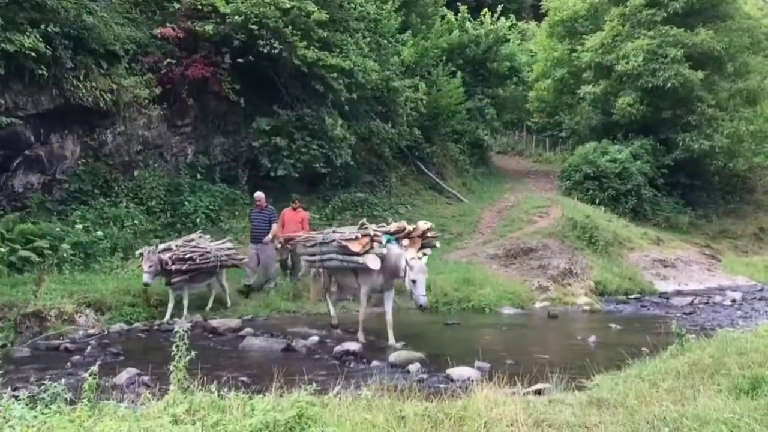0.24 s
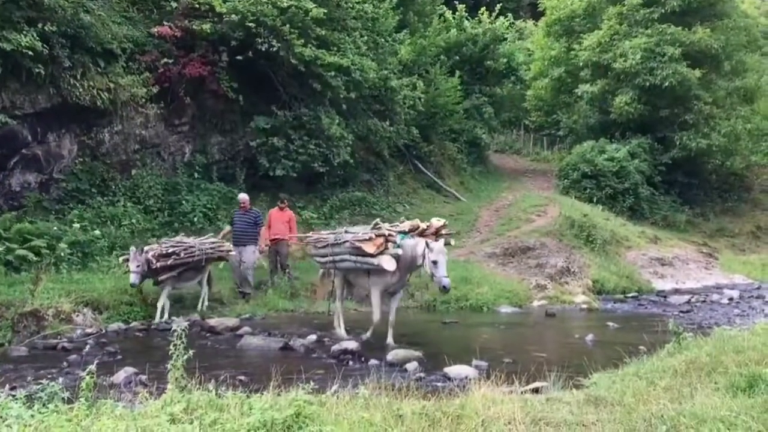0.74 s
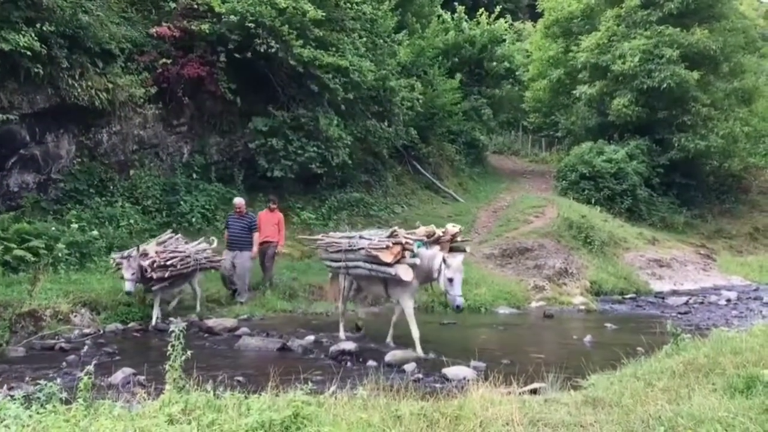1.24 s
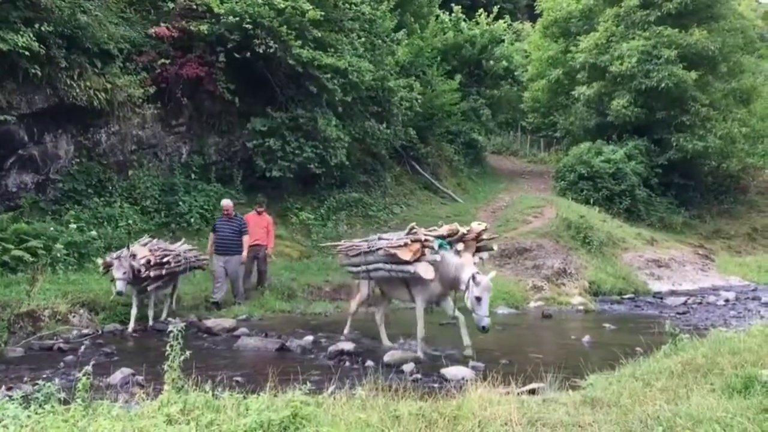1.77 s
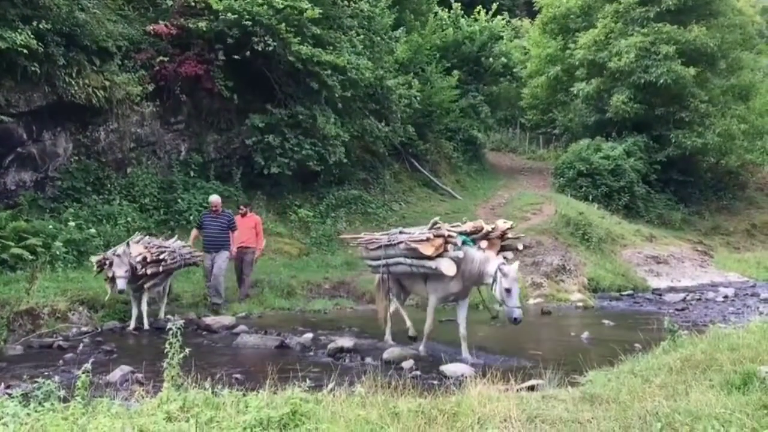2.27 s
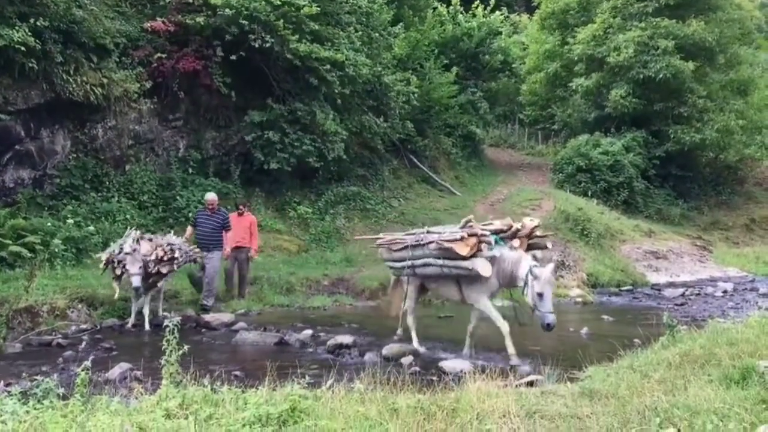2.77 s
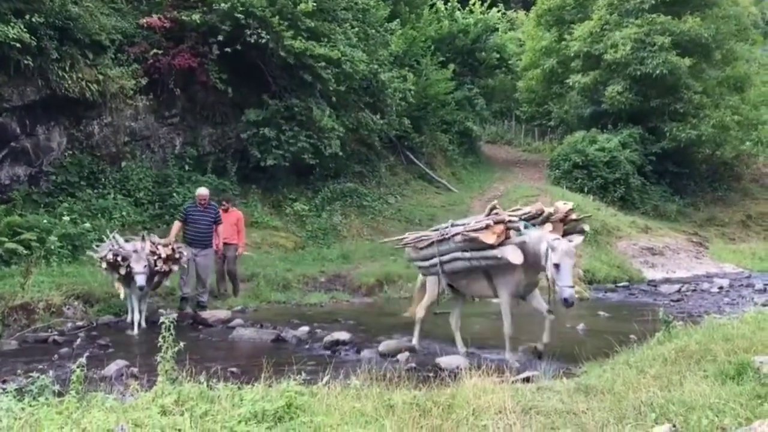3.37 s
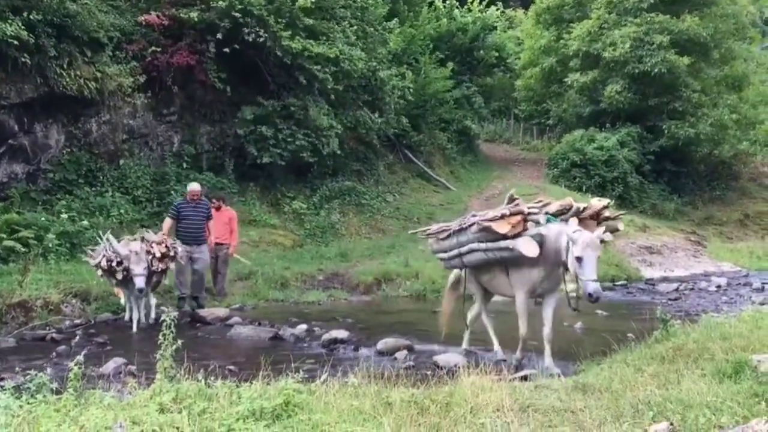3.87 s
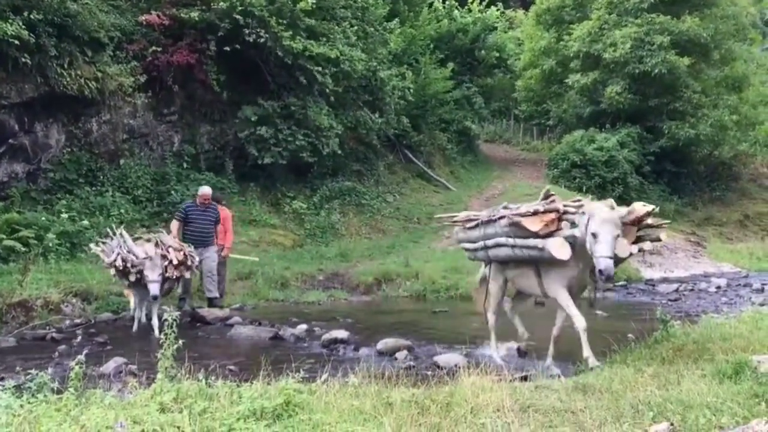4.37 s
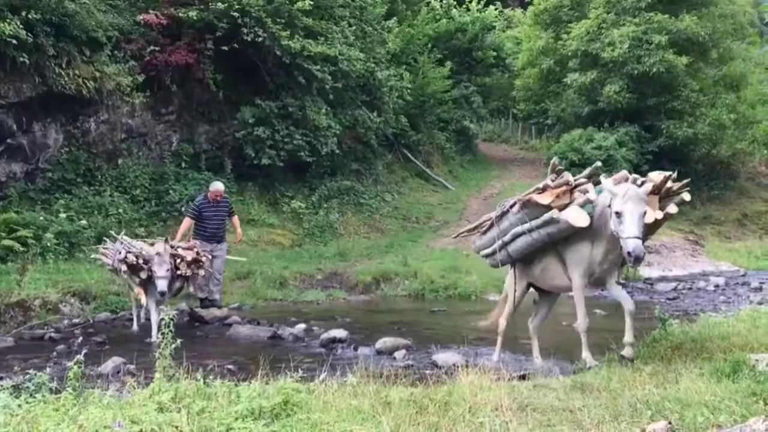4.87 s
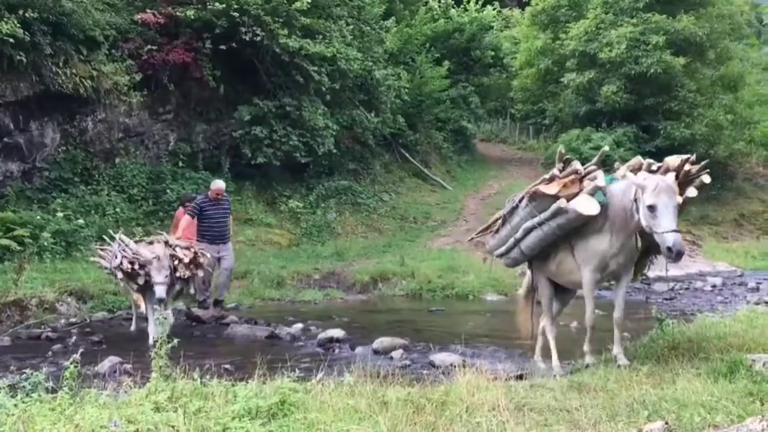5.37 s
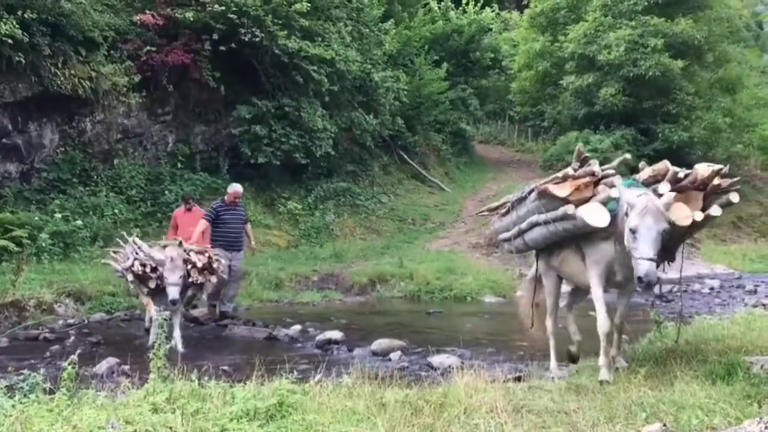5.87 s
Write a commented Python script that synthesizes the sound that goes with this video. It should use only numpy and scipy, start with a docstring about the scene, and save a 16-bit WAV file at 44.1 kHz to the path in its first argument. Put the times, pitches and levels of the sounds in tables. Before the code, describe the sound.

Outdoors by a shallow stream, water runs steadily and light wind bumps the microphone. Hooves knock on stones and faintly splash. Then a donkey brays four times: each hee is a shrill, breathy indrawn whistle, each haw a lower, rough, rattling open-throated cry. The first and third haws sink into a low groan. Small splashes continue, with a weak echo from the wooded bank.

```python
"""Out in the shallows of a stream under a wooded bank, water runs and light wind bumps the microphone.
First a pack donkey's hooves knock on stones and splash as it wades: short dying bursts of noise.
From 1.4 s it brays four times. Each hee is a whistle in a rush of indrawn air, shrill when blown hard;
each haw is a rough, rattling voice through an open throat, and the first and third end in a low groan.
Splashes go on among the brays; the bank returns a weak echo and scatter, and a fast limiter holds the peaks."""
import sys
import numpy as np
from scipy import signal
from scipy.fft import rfft, irfft, next_fast_len
from scipy.io import wavfile
from scipy.ndimage import uniform_filter1d, minimum_filter1d

SR = 44100
rng = np.random.default_rng(int(sys.argv[2]) if len(sys.argv) > 2 else 0)


def log_audio(samples):
    """Write samples as a 16-bit WAV file to the path given in sys.argv[1]."""
    # one column per channel
    frames = np.atleast_2d(samples).T
    # limit to full scale, then quantise
    limited = np.clip(frames, -1, 1)
    pcm = np.round(limited * 32767).astype(np.int16)
    wavfile.write(sys.argv[1], SR, pcm)


N = 269892
TIME = np.arange(N) / SR

# Levels in the tables of single sounds are nominal: the functions add trims and envelopes.
# the hees: (start t/s, length t/s, weak lead-in t/s, air's tail t/s, whistle level/dB, opening squeak level/dB,
#   whistle growth level/dB, rushing air level/dB, air growth level/dB, air arch level/dB, bright hiss level/dB)
HEES = [(1.378, 0.2884, 0.0097, .05, -22, -61, 3.5, -38, 12.5, 14.5, -50.5),
        (2.568, 0.21, 0.026, 0.082, -20.5, -57, 0.5, -33, -6.5, 4, -40.5),
        (3.507, 0.469, 0.00082, 0.085, -22.5, -34, 3, -32.5, 0.5, 6, -39.5),
        (5.017, 0.39, 0.01, 0.2, -20.5, -44, -1, -36, 6, -0.5, -44)]
# pitch of the whistle, one curve a hee: (t/s, f/Hz)
WHISTLE_PITCHES = [
    [(1.35, 2438), (1.542, 2357), (1.55, 2190), (1.554, 2360), (1.594, 2266), (1.66, 2308), (1.69, 2260)],
    [(2.53, 2395), (2.548, 2378), (2.552, 2415), (2.582, 2274), (2.732, 2309), (2.78, 2227), (2.8, 2330)],
    [(3.5, 2498), (3.508, 2560), (3.536, 2325), (3.656, 2316), (3.882, 2140), (3.92, 2116), (3.99, 2197)],
    [(5.0, 2530), (5.034, 2410), (5.04, 2390), (5.206, 2231), (5.278, 2358), (5.372, 2278), (5.42, 2343)],
]
# the whistle cracks, jumping up and thinning: t/s
CRACK_TIMES = [2.553, 2.625, 3.805, 5.029, 5.067, 5.139]
# the whistle slips and part of it turns to rushing air: (middle t/s, length t/s, loss level/dB)
SLIPS = [(1.515, .2, 12.5), (2.62, 0.098, 2.5), (3.555, 0.1, 9), (3.625, 0.12, 6), (3.94, .17, 9.5),
         (5.295, .09, -0.5)]
# overtones of the whistle: (multiple, rounded when used; level/dB)
OVERTONES = [(2, -18.5), (3, -12.5), (4, -31.5), (5, -11), (6, -35), (7, -21)]
# resonances of the indrawn air: (f/Hz, width f/Hz, level/dB)
INHALE_MODES = [(1264, 290, 1.5), (1732, 540, 7.5), (2240, 120, -1)]
# colour of the bright hiss around 3 kHz that goes with the hee: (f/Hz, level/dB per Hz)
BRIGHT_HISS_COLOUR = [(1500, -47), (2500, -9), (2900, 7), (3450, 8), (4200, -16.5), (7000, -14.5),
                      (15000, -44)]

# the haws: (start t/s, length t/s, effort level/dB, settled roughness 0-1, first, turning and last pitch f/Hz,
#   turn at share of length, first, turning and last throat f/Hz before narrowing and closing,
#   chest share level/dB, late chest gain level/dB, final closing of the mouth 0-1)
HAWS = [(1.74, 0.36, -22.5, .64, 413.4, 444.6, 428.6, 0.43, 1286, 1315, 1376, -12, 2.5, .01),
        (2.857, 0.5, -24, 0.67, 424, 441.5, 383.7, 0.66, 1314, 1276, 1326, -13, 7.5, 0.18),
        (4.028, 0.095, -23, 0.69, 440, 447.3, 409, 0.47, 1330, 1334, 1310, -12.5, -3, 0.08),
        (4.099, .7, -22, .68, 440, 418.9, 371.9, .42, 1273, 1275, 1410, -12, 12.5, 0.25),
        (5.524, 0.69, -22, .68, 354, 365.3, 322, .4, 1367, 1378, 1196, -17, 1, .02)]
# the mouth gapes and the throat weakens (negative: strengthens):
# (middle t/s, length t/s, ring gain level/dB, rasp gain level/dB, throat loss level/dB)
GAPES = [(1.83, 0.15, 6.5, 0, 0.5), (2.05, 0.15, 8, 4.5, -2), (3.15, 0.29, 9, 6, -1.5),
         (3.25, 0.14, 13.5, 7.5, -2), (4.47, 0.095, 13, 3.5, 2.5), (4.56, 0.18, 7.5, -0.5, -1.5),
         (5.69, 0.36, 4, 0.5, 2), (5.945, 0.1, 15.5, -1.5, 2), (6.07, 0.19, 13, -2, 0)]
# groans that end a haw: (start t/s, length t/s, effort level/dB, change at the end level/dB,
#   first roughness 0-1, first pitch f/Hz, first throat f/Hz, chest share level/dB, ring share level/dB)
GROANS = [(2.048, 0.22, -20.5, -21, 0.17, 308.6, 1507, -15, -15),
          (4.792, 0.209, -42.5, 3.5, 0.57, 295.5, 1300, -6.5, -5)]
# short catches of the throat: (t/s, level/dB, length t/s, resonance f/Hz, width f/Hz)
CATCHES = [(1.744, -34.5, 0.031, 850, 159), (2.403, -45, 0.067, 1980, 500), (2.847, -27, 0.012, 1170, 1050),
           (5.399, -32, 0.026, 1770, 391), (5.447, -29, 0.05, 1747, 150), (5.528, -29.5, 0.051, 1040, 220)]
# resonances of the chest: (f/Hz, width f/Hz, level/dB)
CHEST_MODES = [(386.3, 164, 10.5)]
# the pharynx at the start of a haw: (f/Hz, width f/Hz, level/dB)
PHARYNX_MODES = [(884, 430, 11.5)]
# resonances of the throat, shifted together by each haw: (f/Hz, width f/Hz, level/dB)
THROAT_MODES = [(1276, 210, 11.5), (1620, 264, 2.1)]
# upper resonance of the open mouth: (f/Hz, width f/Hz, level/dB)
MOUTH_MODES = [(2015, 900, 0)]
# colour of the rasp: (f/Hz, level/dB per Hz)
RASP_COLOUR = [(2000, -85), (2700, 4.5), (3200, 12.5), (4100, 1.5), (6000, 1), (7600, -15), (9000, -13),
               (11300, -7), (13000, -13), (15500, -17.5)]

# hooves on stones: (t/s, level/dB)
KNOCKS = [(0.15, -29), (0.181, -27.5), (0.25, -31), (0.626, -30), (0.645, -36), (1.209, -34.5)]
# splashes: (t/s, level/dB)
SPLASHES = [(0.1775, -67), (1.0999, -62), (3.3275, -60), (3.355, -54), (3.9805, -53.5), (4.5944, -50),
            (4.6274, -53.5), (5.2275, -51)]
# colour of a knock: (f/Hz, level/dB per Hz)
KNOCK_COLOUR = [(100, -46), (400, -11), (1100, 3.5), (1900, -1), (3500, -10), (9000, -51), (16000, -47)]
# colour of a splash: (f/Hz, level/dB per Hz)
SPLASH_COLOUR = [(1000, -17), (3000, 0), (5500, 1.5), (8200, 2), (9500, -7), (16000, -27)]
# the stream before rippling: (t/s, running water level/dB, wading slosh level/dB)
WATER_LEVELS = [(0, -49.5, -47.5), (.8, -49, -47), (.98, -47.5, -54.5), (2.35, -51, -44), (3.4, -46.5, -60),
                (6.12, -44.5, -54.5)]
# colour of running water: (f/Hz, level/dB per Hz)
WATER_COLOUR = [(40, 10), (100, -6), (170, -2.5), (300, 3.5), (700, 2), (1200, -1), (2000, -2.5),
                (3300, -7), (5000, -17.5), (9000, -24), (15500, -34)]
# the dull slosh of wading legs: (f/Hz, level/dB per Hz)
SLOSH_COLOUR = [(60, -19), (300, -3.5), (1200, -7.5), (3000, -17), (15000, -40.5)]
# dying away of the scatter from the wooded bank: (f/Hz, 60 dB decay t/s)
BANK_DECAY = [(200, 0.077), (1500, 0.17), (4000, 0.074), (12000, 0.027)]
# wind buffets, added to the calm level: (t/s, level/dB, length t/s)
GUSTS = [(0, -45.5, 0.059), (0.21, -51.5, 0.26), (0.633, -43.5, 0.099), (0.762, -45, 0.21),
         (2.41, -45.5, 0.086), (2.661, -40.5, 0.11), (3.047, -52, 0.051), (4.413, -48, 0.11),
         (4.93, -49, 0.09), (5.402, -48, 0.077), (5.73, -40, 0.15)]
# colour of wind at the microphone: (f/Hz, level/dB per Hz)
WIND_COLOUR = [(15, -24), (48, 0), (85, -2), (130, -13), (250, -25), (2000, -90)]

# hee: the air starts before the whistle, swells in after its start and outlasts it
AIR_LEAD_S, AIR_SWELL_S = .075, 0.022
AIR_LEAD_DB, AIR_ONSET_DB, AIR_TRAIL_DB = -20.5, -3, -20
HISS_LEAD_DB, HISS_SAG_DB = -13, -7
# the whistle starts weakly before it catches
WHISTLE_CATCH_S, WHISTLE_WEAK_DB = 0.014, -11
WHISTLE_RELEASE_S, WHISTLE_OFF_DB = 0.047, -36
SLIP_TO_AIR = 0.12  # dB of air gained per dB of whistle lost
# attack and release of haws and groans
ATTACK_S, RELEASE_S, SILENT_DB = 0.028, 0.033, -20.5
# a haw starts rougher and chestier with a narrower throat, and settles quickly
SETTLE_S, START_ROUGH, START_CHEST_DB, START_NARROW = 0.031, .3, 13.5, 0.02
LATE_EFFORT_DB, SURGE_DB = -5, 1.38  # the effort tires and surges
RING_DB, RASP_DB = -19, -21  # shares of mouth ring (before its trim) and rasp
BREATH_S = 0.51  # time in which the air runs out
CLOSING_S = 0.0674  # the mouth closes over the end of a haw
# groan: share of length held before it changes, then how it sags and dulls
GROAN_HOLD, GROAN_SAG_HZ_PER_S, GROAN_CLOSING = 0.41, 195, 0.22
GROAN_END_ROUGH, GROAN_RASP_DB, GROAN_DULLING_DB = 1, -17.5, -19
BAND_EDGE_HZ = 15650


def hee(row, pitch, squeak_s=0.012, jitter=0.0033, flutter=0.11, air_trim_db=2.5, knee_db=-22,
        hiss_trim_db=-2.5, gasp=0.4, air_grit=0.65, crack_s=0.00323, crack_db=-9, crack_leap=0.0636,
        breathy_db=-7):
    """Indrawn air whistles in the larynx; blown hard, the whistle turns shrill."""
    start, length, lead, tail, level_db, squeak_db, *breath = row
    t = np.arange(start - AIR_LEAD_S, start + length + tail, 1 / SR)
    tone_db, rush_db, bright_db = inhale(t, start, length, lead, tail, level_db, *breath)
    crack = sum(np.exp(-((t - s) / crack_s) ** 2) for s in CRACK_TIMES)
    hz = follow(pitch, t)[0] * (1 + crack_leap * crack)

    # the more air rushes past, the weaker and less steady the whistle
    breathy = np.minimum(amp(rush_db - tone_db), 1)
    unrest = 1 + 3 * breathy
    turns = np.cumsum(hz * (1 + jitter * unrest * wobble(len(t), hz=240))) / SR
    strength = amp(tone_db + crack_db * crack + breathy_db * breathy ** 2)
    fluttering = evened(np.exp(flutter * unrest * wobble(len(t), hz=44.6)))
    whistle = strength * np.exp(2j * np.pi * turns) * fluttering

    gusty = rng.standard_normal(len(t)) * np.exp(gasp * wobble(len(t), hz=79))
    rush = amp(rush_db + air_trim_db) * steadied(tract(gusty, INHALE_MODES), seconds=0.72)

    # above a knee the wave steepens and grows mostly odd overtones
    wave = whistle + air_grit * rush
    shrill = abs(wave) / (1 + (amp(knee_db) / (abs(wave) + 1e-9)) ** 2.1)
    overtones = shrill * sum(amp(db) * np.cos(round(k) * np.angle(wave)) for k, db in OVERTONES)
    # the whistle catches with a brief squeak an octave up
    squeak = amp(squeak_db) * np.exp(-(2 * (t - start) / squeak_s - 1) ** 2)
    overtones += squeak * np.cos(2 * np.angle(whistle))

    hiss = amp(bright_db + hiss_trim_db) * coloured(gusty, BRIGHT_HISS_COLOUR)
    sound = np.sqrt(2) * ((whistle + rush).real + overtones) + hiss
    return t[0], sound * signal.windows.tukey(len(t), .03)


def inhale(t, start, length, lead, tail, tone_db, tone_growth_db, air_db, growth_db, arch_db, hiss_db):
    """Levels of whistle, air and bright hiss: the air grows and arches around the whistle."""
    end = start + length
    u = np.clip((t - start) / length, 0, 1)
    slip_db, = bumps(SLIPS, t)
    catches = start - WHISTLE_CATCH_S
    begins = catches - max(lead, 0)
    attack = np.interp(t, [begins - WHISTLE_CATCH_S, begins, catches, start],
                       [WHISTLE_OFF_DB, WHISTLE_WEAK_DB, WHISTLE_WEAK_DB, 0])
    release = WHISTLE_OFF_DB * np.maximum(t - end, 0) / WHISTLE_RELEASE_S
    tone = attack + tone_growth_db * (u - .5) + release
    swell = np.interp(t, [start - AIR_LEAD_S, start, start + AIR_SWELL_S], [AIR_LEAD_DB, AIR_ONSET_DB, 0])
    flow = SLIP_TO_AIR * slip_db + np.interp(t, [end, end + tail], [0, AIR_TRAIL_DB])
    air = swell + growth_db * (u - .5) - arch_db * (2 * u - 1) ** 2
    hiss = np.interp(t, [start - AIR_LEAD_S, start], [HISS_LEAD_DB, 0]) + HISS_SAG_DB * (u - .5)
    return tone_db + tone - slip_db, air_db + air + flow, hiss_db + hiss + flow


def haw(start, length, effort_db, rough, first_hz, turn_hz, last_hz, turn, first_throat_hz, turn_throat_hz,
        last_throat_hz, chest_db, late_db, closing):
    """One push of air: pitch and throat turn once, and the chest's share shifts as the effort tires."""
    age = np.arange(0, length, 1 / SR)
    t, u = start + age, age / length
    fresh = np.exp(-age / SETTLE_S)
    ring_db, rasp_db, loss_db = bumps(GAPES, t)
    surge_db = SURGE_DB * wobble(len(t), hz=6.6)
    level_db = effort_db + held(t) + LATE_EFFORT_DB * u ** 2 + surge_db - loss_db
    hz = np.interp(u, [0, turn, 1], [first_hz, turn_hz, last_hz])
    shut = np.clip(closing, 0, .5) * np.interp(age, [length - CLOSING_S, length], [0, 1])
    opening = 1 - START_NARROW * fresh - shut
    throat_hz = opening * np.interp(u, [0, turn, 1], [first_throat_hz, turn_throat_hz, last_throat_hz])
    # the chest is spared the throat's loss
    low_db = chest_db + START_CHEST_DB * fresh + late_db * u ** 2 + loss_db
    return voiced(t, age / BREATH_S, hz, rough + START_ROUGH * fresh, level_db, throat_hz, low_db,
                  RING_DB + ring_db, RASP_DB + rasp_db)


def groan(start, length, effort_db, fade_db, first_rough, pitch_hz, throat_hz, chest_db, ring_db, spent=0.85):
    """On the last of the air the folds drop to a low note, which sags, frays and dulls."""
    age = np.arange(0, length, 1 / SR)
    t, u = start + age, age / length
    late = np.interp(u, [GROAN_HOLD, 1], [0, 1])
    rough = first_rough + (GROAN_END_ROUGH - first_rough) * late ** 2
    hz = pitch_hz - GROAN_SAG_HZ_PER_S * age
    level_db = effort_db + held(t) + fade_db * late
    low_db = chest_db - fade_db * late  # the chest is spared the change of level
    dulling_db = GROAN_DULLING_DB * late
    return voiced(t, spent + age / BREATH_S, hz, rough, level_db, throat_hz * (1 - GROAN_CLOSING * u),
                  low_db, ring_db + dulling_db, GROAN_RASP_DB + dulling_db)


def voiced(t, spent, hz, rough, effort_db, throat_hz, low_db, mouth_db, high_db, jitter=.045, air=0.86,
           low_air=.72, sink=0.14, ring_trim_db=-2, bite=1.18):
    """The folds slap in uneven bursts, driving chest, throat and mouth; each strong burst spits a rasp."""
    # rough folds jitter from cycle to cycle and waver more slowly
    waver = .026 * wobble(len(t), hz=25)
    turns = np.cumsum(hz * (1 + rough * (waver + jitter * wobble(len(t), hz=151.0)))) / SR
    buzz = evened(sum(np.cos(2 * np.pi * k * turns) for k in range(1, 46)))
    pulses = (1 - .84 * rough) * buzz
    # air escapes at each opening of the folds
    puffs = rough * evened((0.073 + np.exp(-(turns % 1) / 0.52)) * rng.standard_normal(len(t)))
    bursts = np.exp(.65 * rough * np.tanh(wobble(len(t), hz=130)))
    drive = bursts * (pulses + air * puffs)
    throat = steadied(tract(drive, THROAT_MODES, throat_hz / THROAT_MODES[0][0]), seconds=0.024)

    # the low resonances get less turbulence; the pharynx sinks as the air runs out
    low_drive = bursts * (pulses + low_air * puffs)
    sinking = 1 - sink * np.minimum(spent, 1) ** 2
    low = tract(low_drive, CHEST_MODES) - tract(low_drive, PHARYNX_MODES, sinking)
    chest = steadied(low.real, seconds=0.13)

    ring = steadied(tract(drive, MOUTH_MODES).real, seconds=0.029)
    rasp = coloured(abs(throat) ** bite * (puffs + 0.41 * pulses), RASP_COLOUR)
    voice = np.sqrt(2) * throat.real + amp(low_db) * chest
    voice += amp(mouth_db + ring_trim_db) * ring + amp(high_db) * rasp
    return t[0], amp(effort_db) * voice * signal.windows.tukey(len(t), .015)


def held(t):
    """Attack, hold and release of the voice, in dB."""
    nearest_end = np.minimum((t - t[0]) / ATTACK_S, (t[-1] - t) / RELEASE_S)
    return SILENT_DB * (1 - np.minimum(nearest_end, 1))


def catch(s, db, length, hz, width):
    """A brief hoarse puff through the narrowed throat."""
    count = int(length * SR)
    puff = tract(rng.standard_normal(count), [(hz, width, 0)]).real
    return s, amp(db) * evened(puff * signal.windows.tukey(count, .7))


def steps(rows, colour, t60, trim_db):
    """Each step is a short dying burst of gravel or spray."""
    out, t = np.zeros(N), TIME[:SR // 4]
    for s, level_db in rows:
        decay = amp(level_db + trim_db - 60 * t / t60)
        add(out, s, decay * coloured(rng.standard_normal(len(t)), colour))
    return out


def stream(drops_per_s=900, drop_spread_db=4, drop_share=0.74, ripple_db=2.83, slosh_ripple_db=1.0):
    """A wash of running water with countless small drops, and the duller slosh of wading legs."""
    wash_db, slosh_db = follow(WATER_LEVELS, TIME)
    falls = rng.random(N) < drops_per_s / SR
    sizes = amp(drop_spread_db * np.minimum(rng.exponential(1, N), 4.5))
    drops = falls * sizes * rng.choice([-1, 1], N)
    wash = coloured(rng.standard_normal(N) + drop_share * evened(drops), WATER_COLOUR)
    slosh = coloured(rng.standard_normal(N), SLOSH_COLOUR)
    running = wash * amp(wash_db + ripple_db * wobble(N, hz=2.4))
    return running + slosh * amp(slosh_db + slosh_ripple_db * wobble(N, hz=25))


def bank(x, wet_db=-22, echo_s=0.036, echo_db=-28):
    """One weak echo off the rock face and a thin scatter from the trees."""
    count = SR // 2
    # about 2000 random reflections a second, none before 12 ms
    taps = rng.standard_normal(count) * (rng.random(count) < 2000 / SR) * (TIME[:count] > .012)
    hz, t, z = signal.stft(taps, SR, nperseg=256)
    tail = signal.istft(z * amp(-60 * t / read(BANK_DECAY, hz)[:, None]), SR, nperseg=256)[1]
    tail *= amp(wet_db) / np.linalg.norm(tail)
    add(tail, echo_s, amp([echo_db]))
    return signal.fftconvolve(x, tail)[:N]


def wind(calm_db=-63):
    """A faint rumble at the microphone, swelling in short buffets."""
    strength = np.full(N, amp(calm_db))
    for s, db, length in GUSTS:
        add(strength, s, amp(db) * signal.windows.tukey(int(length * SR), .8))
    return strength * steadied(coloured(rng.standard_normal(N), WIND_COLOUR), seconds=0.061)


def tract(x, modes, mouth=1):
    """Steep resonances that all shift with the mouth; returns a complex wave."""
    out = 0
    for k, (hz, width, db) in enumerate(modes):
        turn = np.exp(2j * np.pi * np.cumsum(hz * mouth * np.ones(len(x))) / SR)
        r = np.exp(-np.pi * width / SR)
        # shift the resonance to 0 Hz, smooth there, and shift back; signs alternate
        smooth = signal.lfilter([(1 - r) ** 2], [1, -2 * r, r * r], x / turn)
        out = out + (-1) ** k * amp(db) * turn * smooth
    return out


def bumps(rows, t):
    """Smooth swells from rows (middle, length, heights..), summed for each height."""
    middle, length, *heights = np.transpose(rows)
    shape = np.cos(np.pi * np.clip((t[:, None] - middle) / length, -.5, .5)) ** 2
    return [shape @ h for h in heights]


def wobble(count, hz):
    """Random motion, mostly slower than about hz, at unit power."""
    lowpass = signal.butter(2, hz, fs=SR, output="sos")
    return evened(signal.sosfilt(lowpass, rng.standard_normal(count + 4000))[4000:])


def coloured(x, points):
    """Gives x a spectrum, at unit power."""
    size = next_fast_len(len(x) + 512)
    gain = amp(read(points, np.fft.rfftfreq(size, 1 / SR)))
    return evened(irfft(rfft(x, size) * gain, size)[:len(x)])


def steadied(x, seconds):
    """Holds the running power at one, leaving faster flutter alone."""
    power = uniform_filter1d(abs(x) ** 2, max(int(seconds * SR), 2))
    return x / np.sqrt(abs(power) + 1e-12)


def evened(x):
    """Scales x to unit power."""
    return x / np.sqrt(np.mean(abs(x) ** 2) + 1e-20)


def amp(db):
    """Amplitude of a level in dB."""
    return 10 ** (np.asarray(db) / 20)


def follow(rows, t):
    """The columns of a curve table at the times t."""
    s, *columns = np.transpose(rows)
    return [np.interp(t, s, c) for c in columns]


def read(points, hz):
    """A table's value at each frequency, interpolated over log frequency."""
    f, value = np.transpose(points)
    return np.interp(np.log(hz + 1), np.log(f + 1), value)


def add(mix, s, sound):
    """Adds a sound to the mix from s seconds on."""
    part = mix[max(round(s * SR), 0):][:len(sound)]
    part += sound[:len(part)]


def scene():
    """The donkey and its steps, heard with the bank, over water and wind."""
    donkey = np.zeros(N)
    for row, pitch in zip(HEES, WHISTLE_PITCHES):
        add(donkey, *hee(row, pitch))
    for row in HAWS:
        add(donkey, *haw(*row))
    for row in GROANS:
        add(donkey, *groan(*row))
    for row in CATCHES:
        add(donkey, *catch(*row))
    hooves = steps(KNOCKS, KNOCK_COLOUR, t60=0.084, trim_db=-6.5)
    spray = steps(SPLASHES, SPLASH_COLOUR, t60=0.11, trim_db=12.5)
    near = donkey + hooves + spray
    return (near + bank(near) + stream() + wind())[None]


def record(dry):
    """A fast limiter holds the peaks; then the band limit."""
    ceiling = .245  # of full scale
    gain = np.minimum(1, ceiling / (abs(dry[0]) + 1e-9))
    limited = dry * uniform_filter1d(minimum_filter1d(gain, size=60), size=60)
    lowpass = signal.firwin(511, BAND_EDGE_HZ, window=("kaiser", 9), fs=SR)
    return signal.oaconvolve(limited, lowpass[None], "same")


dry = scene()
out = record(dry)
log_audio(out)
```